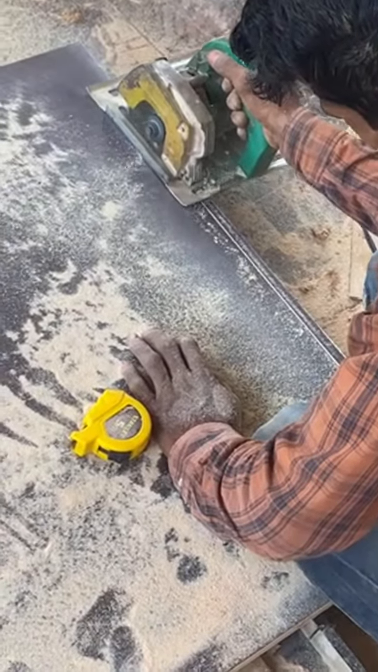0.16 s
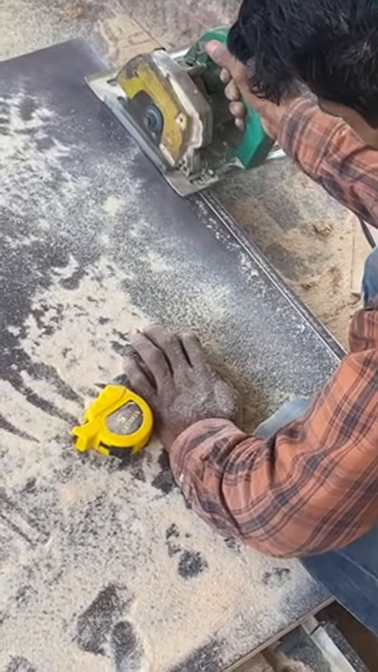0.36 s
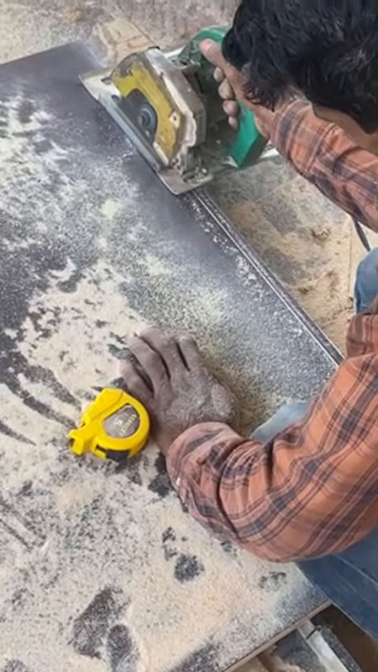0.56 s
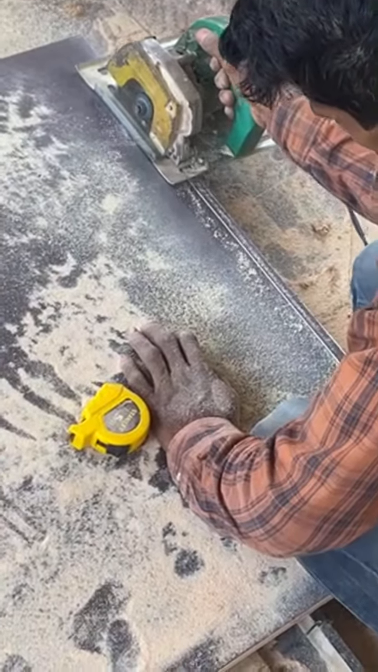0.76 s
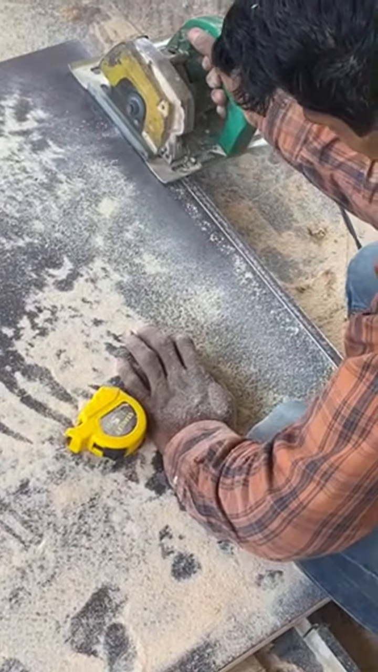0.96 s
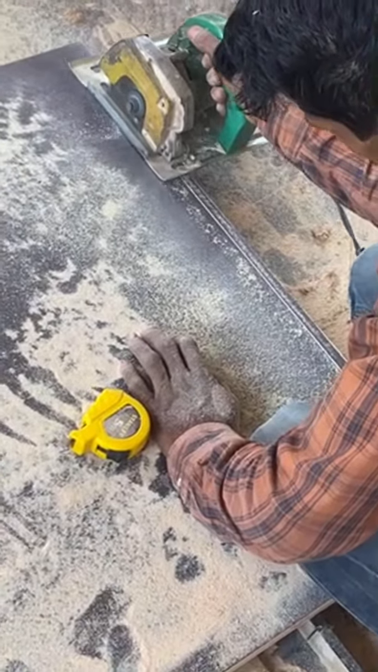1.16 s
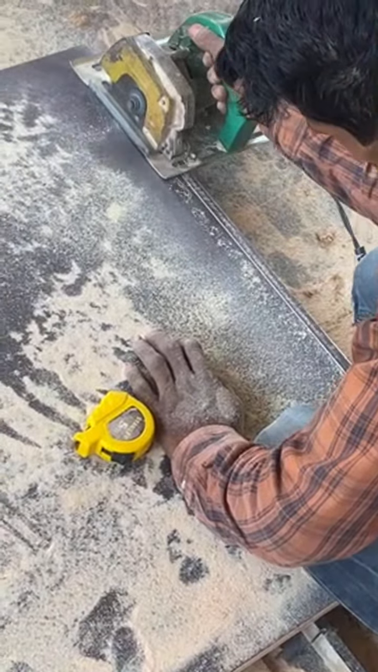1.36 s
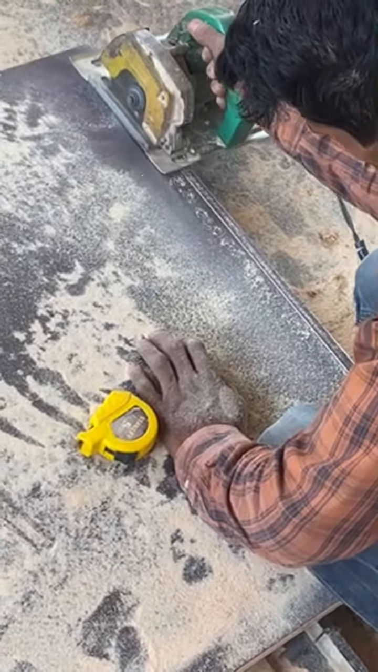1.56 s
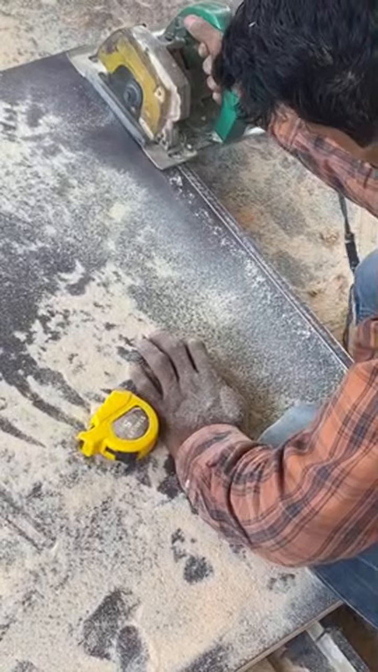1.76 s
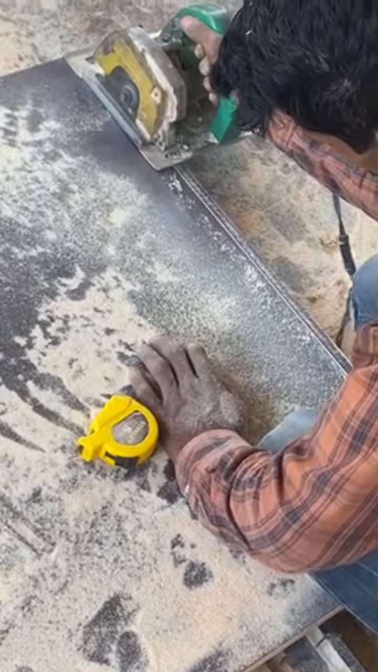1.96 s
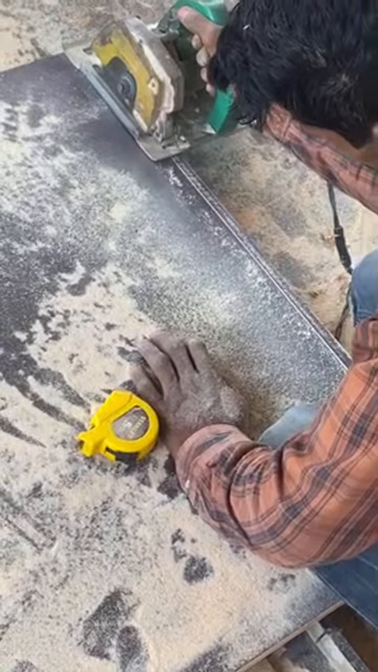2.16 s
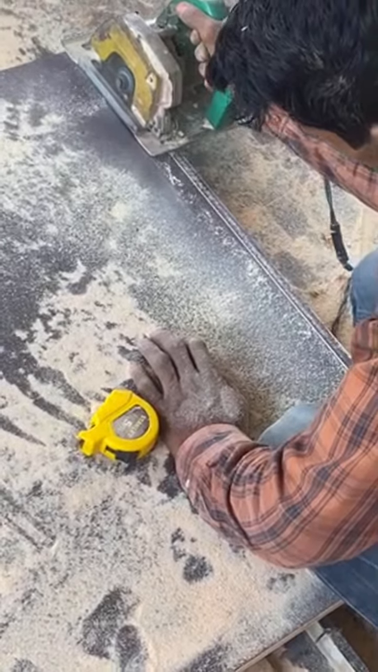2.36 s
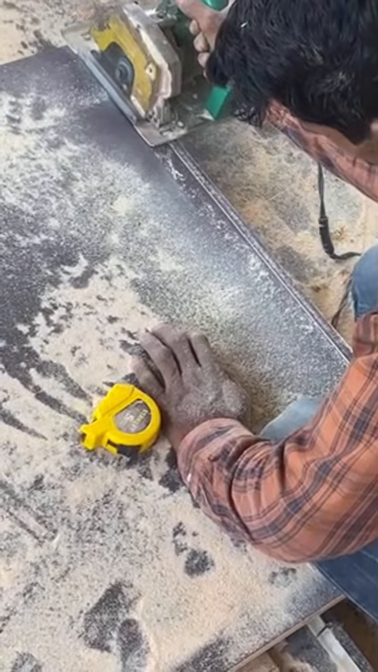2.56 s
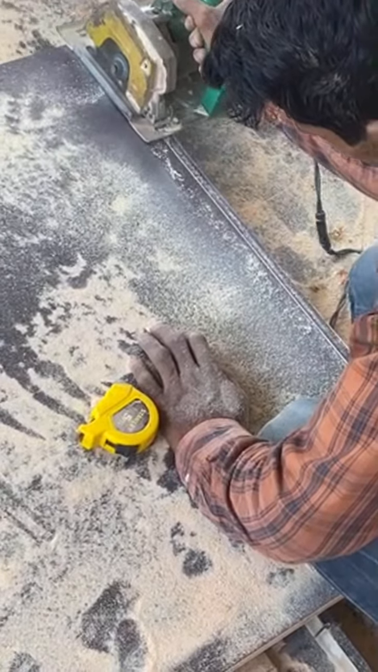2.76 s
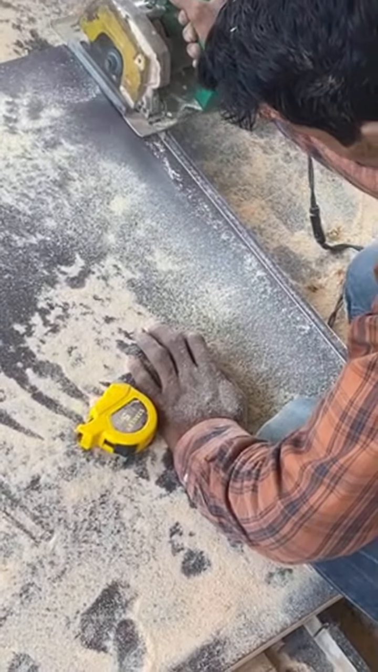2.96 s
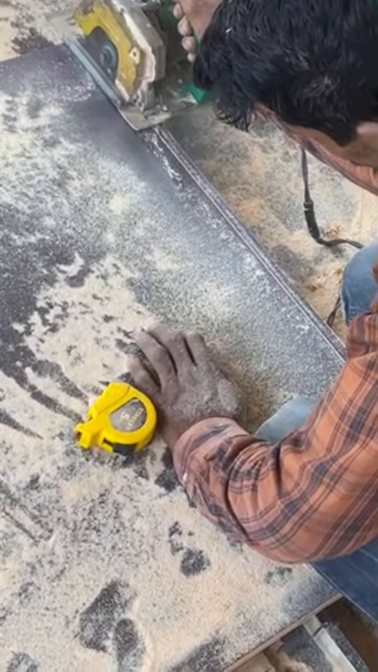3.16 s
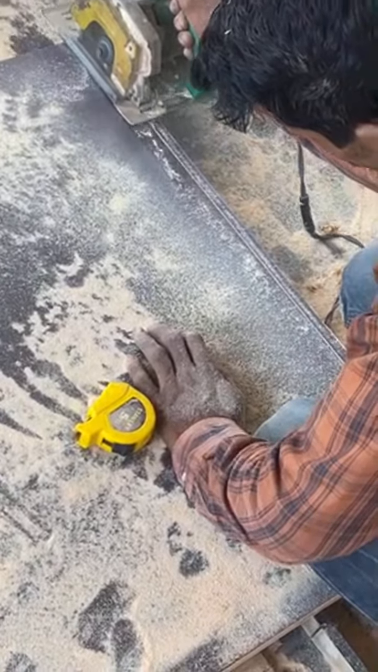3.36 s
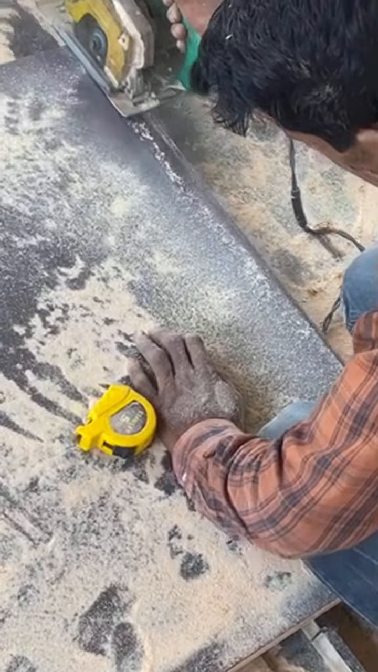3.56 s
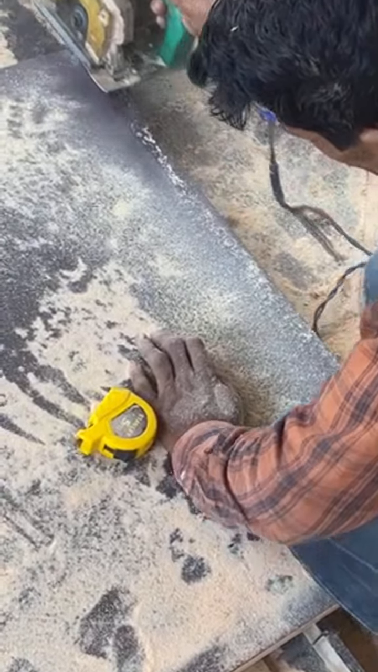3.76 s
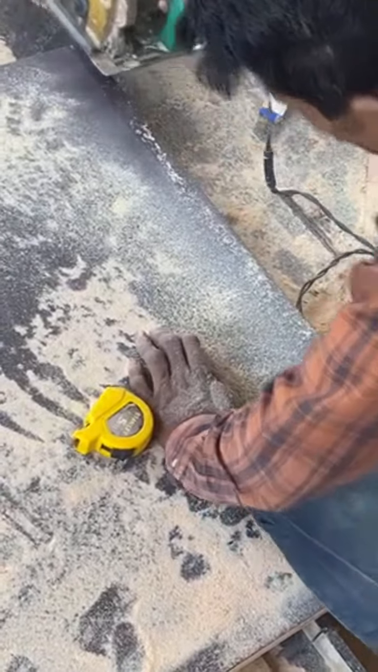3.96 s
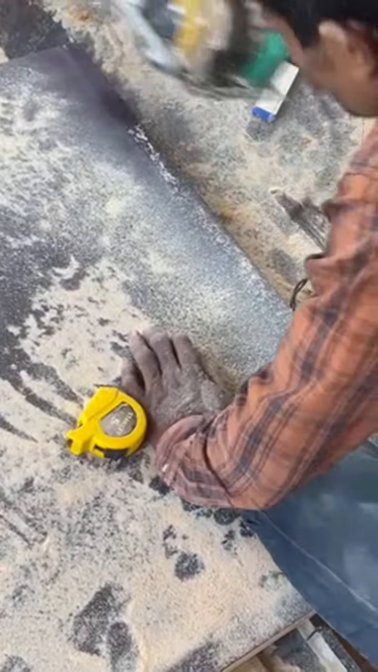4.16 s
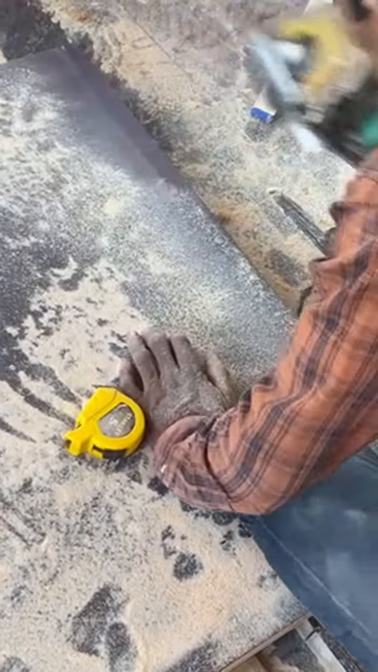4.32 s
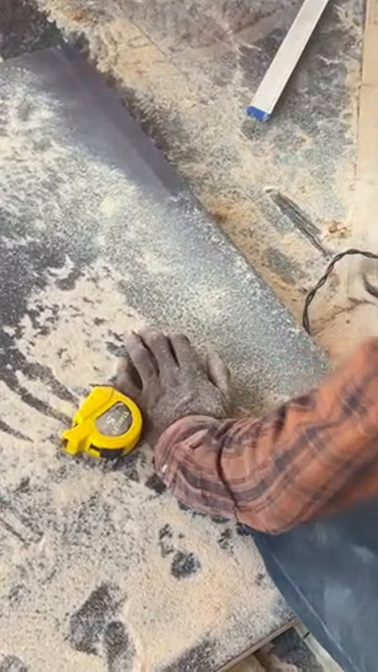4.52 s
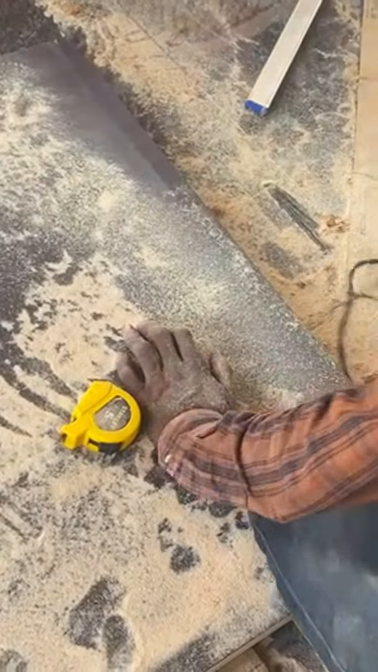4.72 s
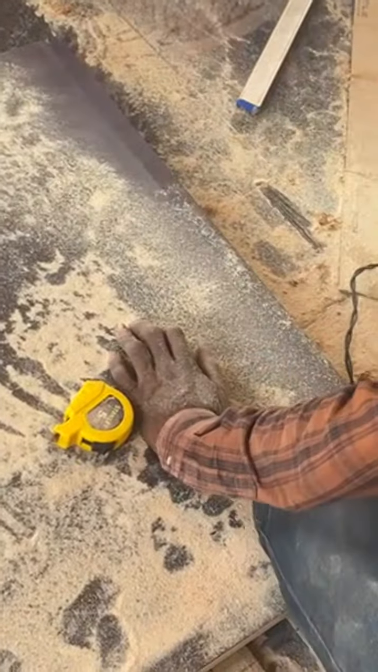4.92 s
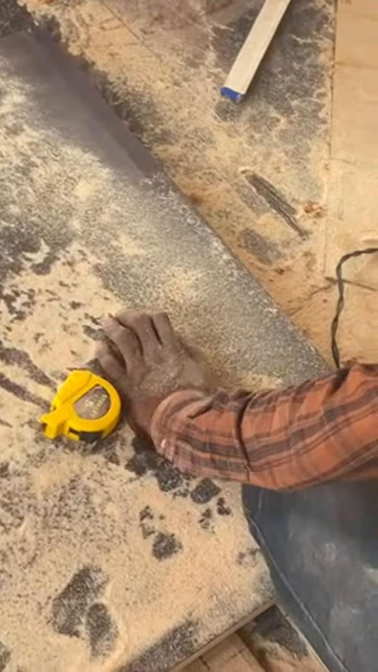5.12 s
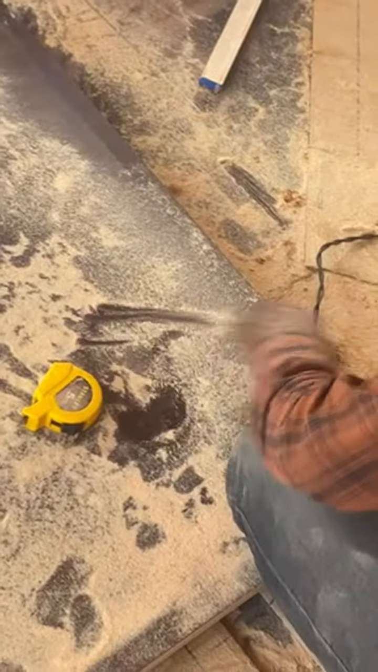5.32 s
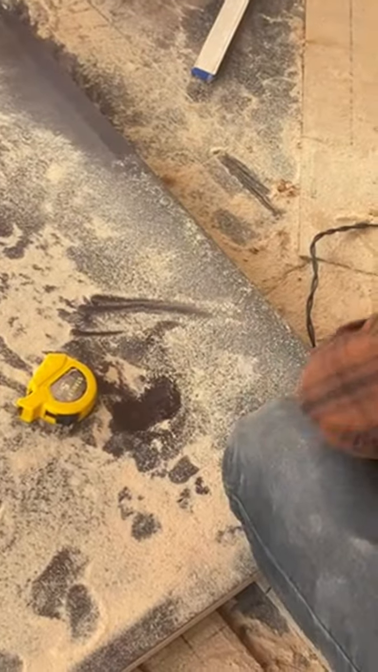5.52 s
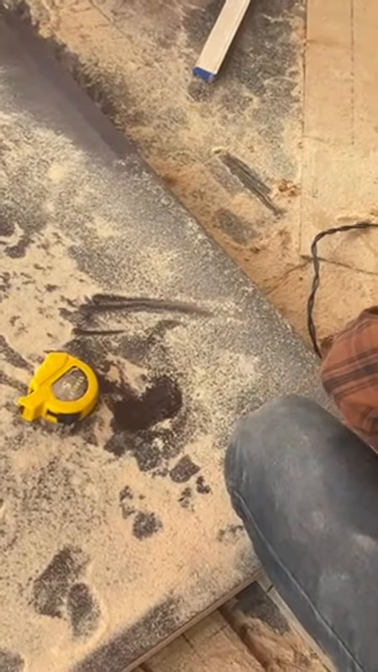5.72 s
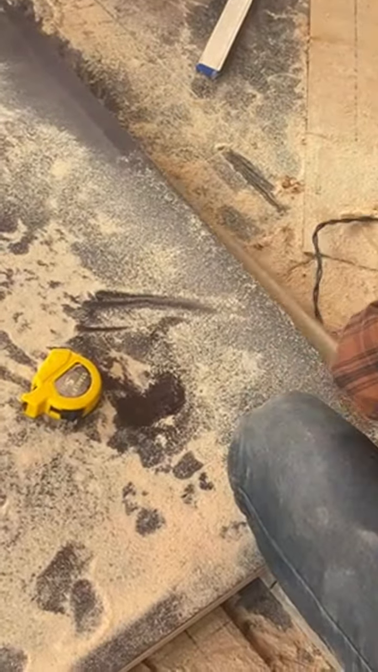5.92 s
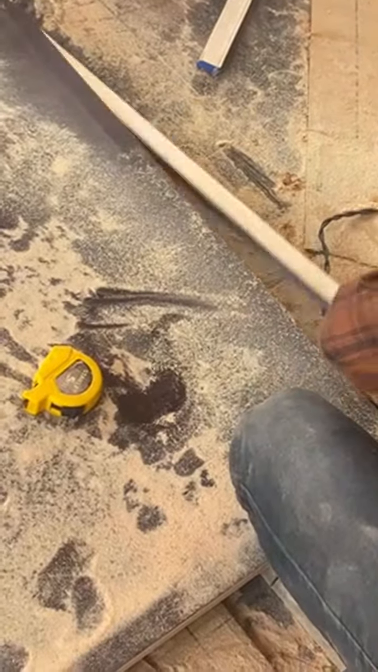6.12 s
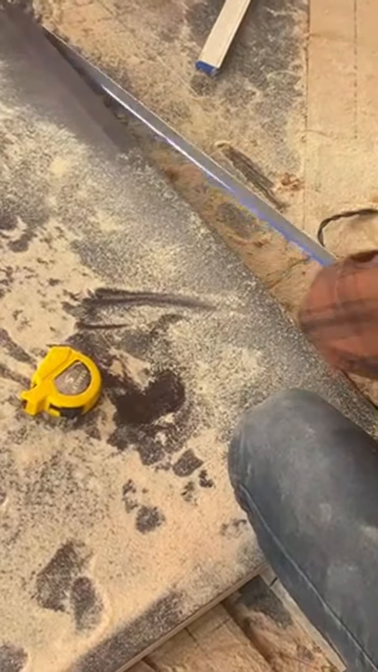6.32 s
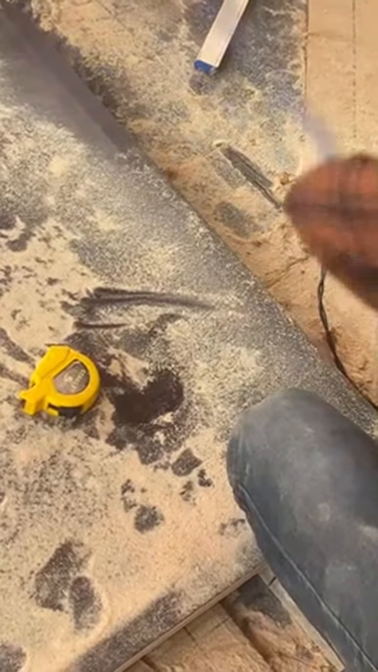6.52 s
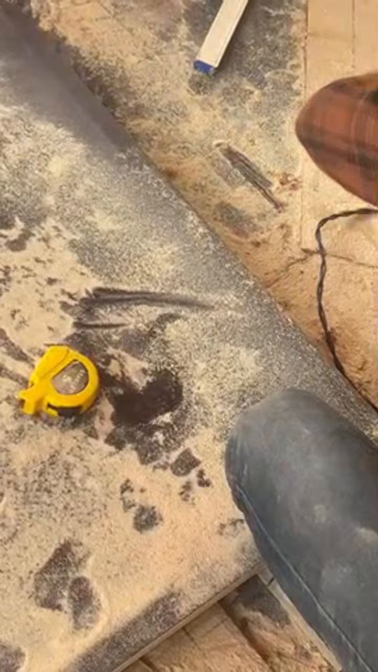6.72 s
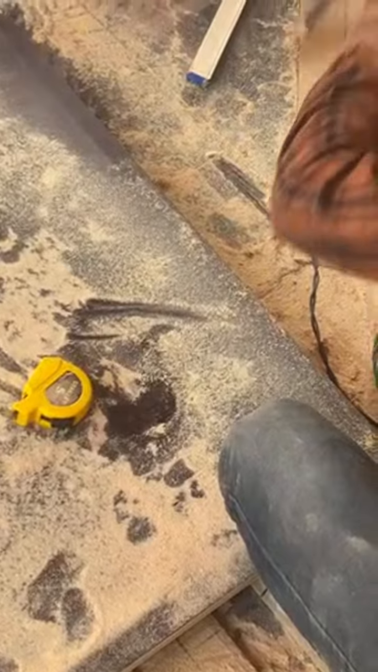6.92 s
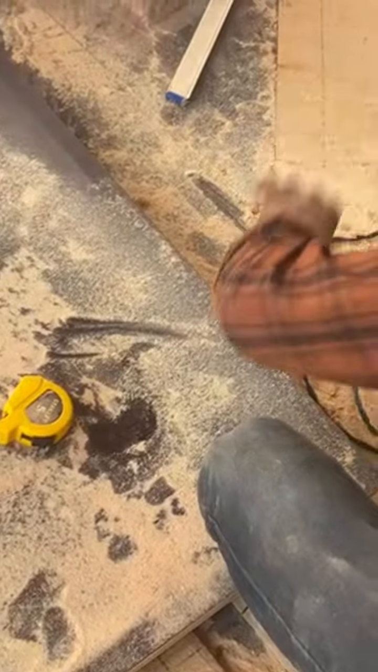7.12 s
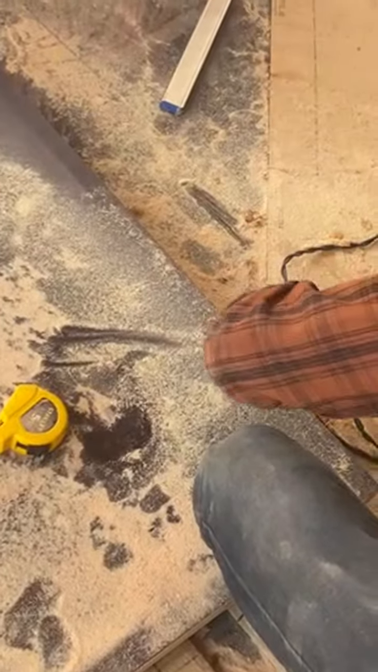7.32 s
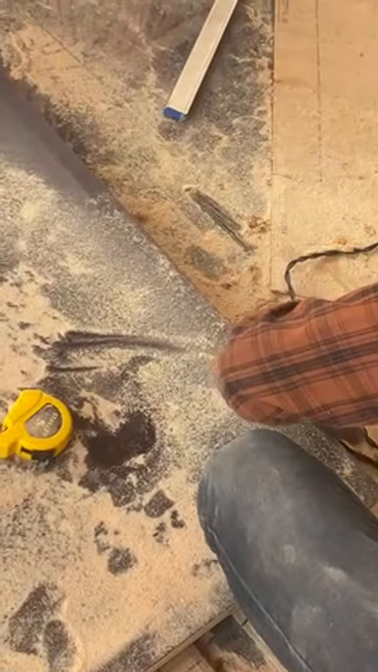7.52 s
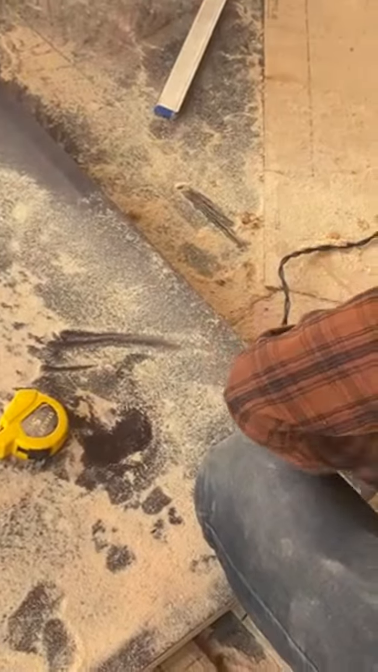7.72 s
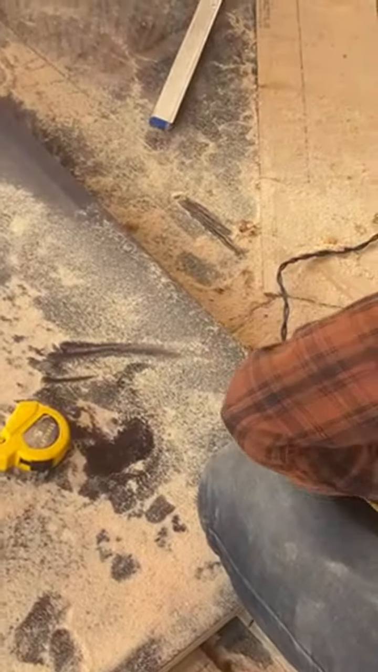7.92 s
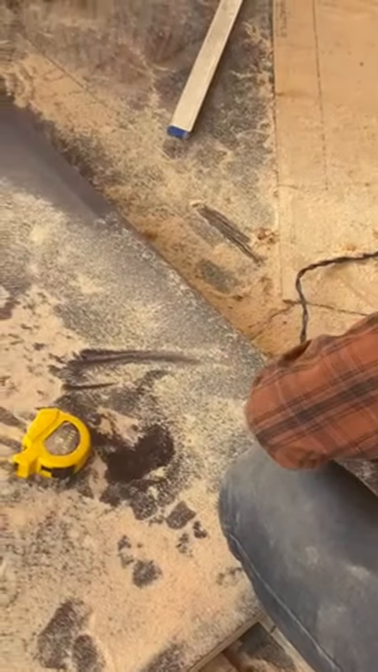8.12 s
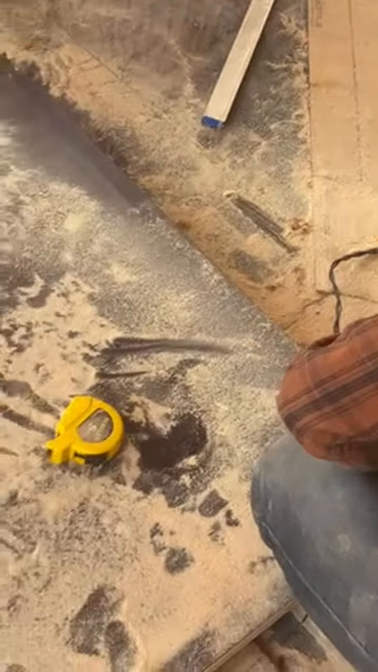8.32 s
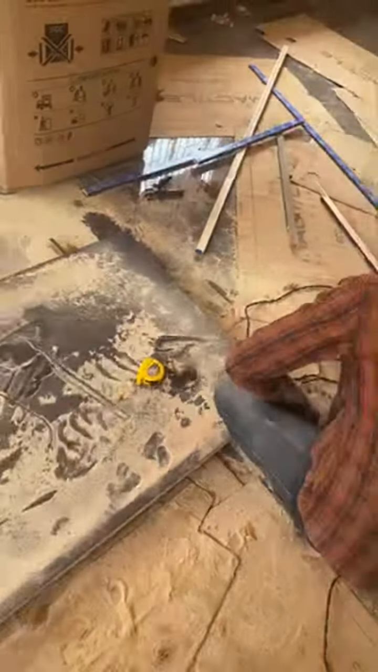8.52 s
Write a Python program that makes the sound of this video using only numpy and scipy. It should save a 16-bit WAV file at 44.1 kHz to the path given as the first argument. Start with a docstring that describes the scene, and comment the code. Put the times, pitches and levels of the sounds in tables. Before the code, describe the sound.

A loud, rough cutting roar with low slab drumming and bright blade hiss fills the first four seconds, speeding up as the cut ends. The freed motor winds down slowly, whirring with airy noise, and the sound vanishes briefly midway. Then faint rattles, a hard scrap bouncing in quick clacks, and a short dull knock. Heard close on a small mono microphone at a work site.

```python
"""A handheld tile cutter grinds through a floor slab: noise rings drifting slab and blade modes, and shaft orders
climb with the speed; grit squeaks, squeals and gear whines are short sliding sines. As the blade leaves the cut,
steady gear tones and a whistle come in, then sink as the motor coasts down amid filtered-noise air and far site
noise. Noise puffs make scuffs and casing rattles; a tossed offcut clatters as short mode rings and noise, and a
dull thump of decaying sines follows. The sound drops out briefly three times."""
import sys
import numpy as np
from scipy import signal
from scipy.fft import rfft, irfft, next_fast_len
from scipy.io import wavfile
from scipy.ndimage import uniform_filter1d, map_coordinates

SR = 44100
rng = np.random.default_rng(int(sys.argv[2]) if len(sys.argv) > 2 else 0)


def rack_gain(trim_db):
    """Turn a fader trim in dB into the linear factor to multiply a signal by."""
    fader = np.asarray(trim_db, float)
    return 10 ** (fader / 20)


def to_wav(sig):
    """Store sig (one row per channel, or 1-D mono) as 16-bit WAV at the path in sys.argv[1].

    Samples outside -1..1 are clipped; the rate is SR.
    """
    pcm = np.clip(np.atleast_2d(sig), -1, 1) * 32767
    pcm = np.round(pcm).astype(np.int16)
    wavfile.write(sys.argv[1], SR, pcm.T)  # frames by channels


N = 378359
T = np.arange(N) / SR
CLEAR_S = 3.8  # the blade starts to leave the slab


def unit(x):
    """Scale to rms 1."""
    return x / np.sqrt(np.mean(x ** 2) + 1e-20)


def curves(rows):
    """One value per sample for each column after the time."""
    time_s, *columns = np.transpose(rows)
    return [np.interp(T, time_s, column) for column in columns]


def wobble(rate_hz, t=T):
    """Smooth random curve, rate_hz knots a second."""
    coarse = t[::16]
    knots = rng.standard_normal(int(N * rate_hz / SR) + 4)
    return np.interp(t, coarse, map_coordinates(knots, [coarse * rate_hz]))


def filtered(x, response):
    """x times a response of frequency."""
    size = next_fast_len(x.shape[-1] + 8192)
    spectrum = rfft(x, size) * response(np.fft.rfftfreq(size, 1 / SR))
    return irfft(spectrum, size)[..., :x.shape[-1]]


def shape(points):
    """Gain through (hz, level_db) points on a log axis."""
    point_hz, level_db = np.transpose(points)
    return lambda hz: rack_gain(np.interp(np.log(hz + 1), np.log(point_hz), level_db))


def modes(table):
    """Resonant bumps of (hz, width_hz, level_db), summed in power."""
    def response(f):
        power = sum(rack_gain(db) ** 2 / (1 + ((f - hz) / (width / 2)) ** 2) ** 2 for hz, width, db in table)
        return np.sqrt(power)
    return response


def patchy(depth_db, tall_bins=6, wide_frames=10, x=None):
    """Noise (or x) whose gain drifts in patches of time and frequency."""
    source = rng.standard_normal(N) if x is None else x
    z = signal.stft(source, nperseg=512)[2]
    field = uniform_filter1d(rng.standard_normal(z.shape), tall_bins, 0)
    field = uniform_filter1d(field, wide_frames, 1)
    return signal.istft(z * rack_gain(depth_db * unit(field)), nperseg=512)[1][:N]


def turns(rate_hz):
    """Phase in radians of a shaft turning at rate_hz."""
    return 2 * np.pi * np.cumsum(rate_hz) / SR


def drifting(x, pitches, strengths, fade_db):
    """x at rms 1 through modes that slide from start to end values in the cut, each waxing and waning."""
    hz, t, z = signal.stft(x[:int(4.3 * SR)], SR, nperseg=4096, noverlap=3072)
    u = np.clip(t / 3.8, 0, 1)
    now = []
    for (start_hz, end_hz), (width_hz, start_db, end_db) in zip(pitches, strengths):
        fade = fade_db * map_coordinates(rng.standard_normal(30), [t * 5])
        now.append((start_hz + (end_hz - start_hz) * u, width_hz, start_db + (end_db - start_db) * u + fade))
    y = signal.istft(z * modes(now)(hz[:, None]), nperseg=4096, noverlap=3072)[1]
    return np.pad(unit(y), (0, N - len(y)))


# shaft speed under load, then freed: (time_s, rate_hz)
SHAFT_SPEED = [(0, 124), (.8, 123.6), (1.05, 124.6), (1.65, 128.3), (2.05, 129.2), (2.55, 133), (2.8, 138),
               (3.55, 148), (3.75, 159), (4, 168)]


def speed():
    """Shaft turns per second: the load curve, then a halving every 4.25 s once the power is cut."""
    switch_off_s, halving_s = 4.27, 4.25
    return curves(SHAFT_SPEED)[0] * 2. ** (-np.maximum(T - switch_off_s, 0) / halving_s)


# magnetic hum, relative to the slab: (pitch_hz, level_db)
MAINS_HUM = [(150., -19.), (200., -11.)]
# side tones beside the shaft orders, and the plain fifth order:
# (multiple, torque_ripple_shift_hz, lowered_by_slow_wobble 0/1)
SIDE_TONES = [(1, 100, 0), (2, 100, 0), (3, 100, 0), (1, 200, 0), (2, 0, 1), (4, 0, 1), (3, 100, 1),
              (2, 300, 0), (5, 0, 0), (4, 200, 0), (4, 300, 0), (5, 200, 0), (5, 300, 0)]
# same tones, row for row, relative to the slab: (level_db at 0.4 s, at 1.25 s, at 2.4 s)
SIDE_TONE_LEVELS = [(-13.5, -4.5, -20.5), (-4, -4.5, -25), (-3.5, -14.5, -21), (-48, -24, -10),
                    (-8.5, -11.5, -18), (-6, -17, -25), (-10.5, -21, -23), (-26, -22.5, -24),
                    (-25, -22, -22), (-15, -22, -25.5), (-18, -21, -25), (-19, -25, -27), (-24, -28, -33)]


def motor_hum(phase):
    """Magnetic hum at mains multiples; side tones beside the shaft orders, and the plain fifth order."""
    mains = 2 * np.pi * T
    hum = sum(rack_gain(db + 2.2 * wobble(6)) * np.sin(mains * hz + .5 * wobble(8)) for hz, db in MAINS_HUM)
    wobble_share, beat_peak_s = .0516, .1  # of shaft speed; the slow wobble has zero phase here
    slow = wobble_share * (phase - phase[round(beat_peak_s * SR)])
    for (multiple, shift_hz, lowered), levels_db in zip(SIDE_TONES, SIDE_TONE_LEVELS):
        level = rack_gain(np.interp(T, (.4, 1.25, 2.4), levels_db) + wobble(6))
        hum += level * np.sin(multiple * phase + mains * shift_hz - lowered * slow)
    return hum


# weaker shaft orders, relative levels: (multiple, level_db)
WEAK_ORDERS = [(3, -6.), (7, -12.), (9, -12.5), (10, -18.), (11, -13.), (12, -24.), (13, -25.), (15, -17.),
               (16, -18.), (20, -16.)]


def weak_orders(phase):
    """Shaft harmonics, fading 4 dB a second."""
    return sum(rack_gain(db + .5 - 4 * T + 2.5 * wobble(4)) * np.sin(k * phase) for k, db in WEAK_ORDERS)


# strong shaft orders: multiples of the shaft speed
STRONG_MULTIPLES = (1, 2, 4)
# strong order loudness by pitch: (pitch_hz, level_db)
SLAB_RESPONSE = [(124, -44), (128, -35), (144, -28), (156, -45), (166, -47), (175, -47), (247, -29),
                 (300, -28.5), (322, -38), (335, -47), (495, -27), (507, -26.5), (517, -33.5), (550, -27),
                 (575, -38.5), (670, -47.5)]


def strong_orders(rate, phase):
    """Shaft harmonics swell and sink as they sweep across the slab's response."""
    out = np.zeros(N)
    for k in STRONG_MULTIPLES:
        level = np.sqrt(2) * shape(SLAB_RESPONSE)(k * rate) * rack_gain(wobble(3) + 1.2 * wobble(15))
        out += level * np.sin(k * phase + .3 * wobble(22))
    return out


def floor_shake():
    """Noise through an 87 Hz mode; the floor shakes most over a hollow stretch."""
    floor_db, peak_db, peak_s, span_s = -52, 16.5, 2.75, 0.89
    level_db = floor_db + peak_db * np.exp(-((T - peak_s) / span_s) ** 2) + 3 * wobble(2.6)
    return rack_gain(level_db) * unit(filtered(patchy(1.8), modes([(87, 57, 0)])))


# the cut, levels before trims: (time_s, drumming_db, upper_modes_db, grinding_db, hiss_db)
CUT_LEVELS = [(0, -19, -24.5, -23, -30.5), (.55, -16.5, -25.5, -23, -31), (1, -18.5, -26.5, -23.5, -30),
              (1.5, -16.5, -23.5, -28, -32.5), (1.85, -16.5, -26, -23.5, -26),
              (2.15, -17.5, -20, -24, -30.5), (2.8, -20, -20.5, -23.5, -32), (3.45, -21, -22, -24, -31),
              (3.57, -21.5, -26, -27, -32), (3.67, -26, -28, -28.5, -31.5), (3.78, -22, -23, -26, -29),
              (3.98, -48, -65, -38.5, -50.5), (4.15, -53, -53, -24, -57)]
# mode pitches drift as the cut lengthens and the blade speeds up: (start_hz, end_hz)
SLAB_LOW_PITCH = [(154, 152), (222, 240), (243, 246), (350, 350), (412, 403), (487, 484), (308, 306),
                  (300, 300), (450, 450)]
SLAB_HIGH_PITCH = [(570, 575), (695, 676), (780, 764), (820, 818), (868, 855), (1000, 996), (720, 720)]
GRIND_PITCH = [(1115, 1090), (1360, 1346), (1850, 1820), (2480, 2460), (2620, 2590), (1300, 1300),
               (2200, 2200), (2850, 2800)]
BLADE_PITCH = [(3280, 3290), (4600, 4700), (5100, 5350), (7150, 7100), (8190, 8360), (8700, 8780),
               (9000, 8950), (9850, 10050), (10020, 10120), (10380, 10880), (11530, 11720), (13600, 13780),
               (15050, 15350), (6300, 6500), (8500, 8500), (7000, 7000), (13000, 13000), (4250, 4150)]
# same modes, row for row, relative levels: (width_hz, start_db, end_db)
SLAB_LOW_STRENGTH = [(9.4, -23.5, 2.5), (12.8, -1, 2), (12, -10.5, -16), (14.815, -15.5, 1.5),
                     (12.9, -8, 6.5), (21.2, -2.5, -2.5), (13.54, -29, -11.5), (101.5, -20.5, -10),
                     (150, -12, -12)]
SLAB_HIGH_STRENGTH = [(40, -0.5, -1), (30, 1.5, 4.5), (39.6, -6.5, 4), (20, -1, 2.5), (24.8, 6, -16.5),
                      (69, -5.5, -5), (417, -2, -2.5)]
GRIND_STRENGTH = [(40, -13, 1), (60, -8, -3.5), (129, -1, -0.5), (120, 2, -1), (140, -6.5, -4.5),
                  (764, -5.5, 0.5), (660, -4, -3), (250, -5.5, -4.5)]
BLADE_STRENGTH = [(370, -3.5, -2.5), (500, -2.5, -16.5), (387, -5, -4.5), (424, 3.5, -3), (150, -15, -1),
                  (150, -18.5, 0), (120, -1, -5), (300, 4, -6.5), (150, -3, -1), (160, -2.5, -3.5),
                  (550, -10.5, -3), (650, -10.5, -6), (500, -6, -9.5), (500, -36, -2), (1500, -4.5, -12),
                  (6060, -15.5, -10.5), (5000, -14.5, -21), (299, -4, -16)]


def cutter():
    """Grit contact beats once a turn and twice a mains cycle, and rings slab and blade."""
    low_db, high_db, grind_db, hiss_db = curves(CUT_LEVELS)
    rate = speed()
    phase = turns(rate)
    beat = 1 + 0.09 * np.cos(phase) + 0.055 * np.cos(2 * np.pi * 100 * T)  # blade run-out, torque ripple
    judder = wobble(14)  # the hand feeds unevenly

    def grit(depth_db, judder_db):
        return patchy(depth_db) * beat * rack_gain(judder_db * judder + 0.3 * wobble(9.05))

    fill_in = rack_gain(-2 * np.clip(1 - T / 1.8, 0, 1))  # noisy drumming starts 2 dB down
    drumming = fill_in * drifting(grit(.8, 1.1), SLAB_LOW_PITCH, SLAB_LOW_STRENGTH, 1.2)
    out = rack_gain(low_db - 1.5) * (drumming + motor_hum(phase))
    out += rack_gain(high_db - .7) * drifting(grit(1.1, 1.1), SLAB_HIGH_PITCH, SLAB_HIGH_STRENGTH, 1.2)
    out += rack_gain(high_db + 3.5) * weak_orders(phase)
    out += rack_gain(grind_db - 3.0) * drifting(grit(1.77, 0.78), GRIND_PITCH, GRIND_STRENGTH, 1.5)
    out += rack_gain(hiss_db - 0.9) * drifting(grit(1.65, 0.65), BLADE_PITCH, BLADE_STRENGTH, 2.0)
    out += floor_shake() + strong_orders(rate, phase)
    return out * np.clip((4.15 - T) / 0.18, 0, 1)  # the blade clears the slab


# cooling air and far site noise, relative density: (pitch_hz, level_db_per_hz)
AIR_SPECTRUM = [(30, -54), (60, -3.5), (100, 1.5), (170, -7), (310, -3), (450, -4.5), (780, 0.5),
                (1000, -2.5), (1300, -1.5), (1650, -5.5), (2100, -3.5), (2500, -7.5), (2750, -14.5),
                (3400, -16), (4500, -36), (6000, -32.5), (9000, -62)]
# spinning blade wind, relative: (pitch_hz, width_hz, level_db)
WIND_MODES = [(8300, 550, -16), (11100, 630, -13), (13570, 500, -3), (15300, 300, -13), (7000, 8400, 1),
              (13000, 6000, -14)]


def moving_air():
    """Shaped noise: cooling air over far noise, blade wind and rumble, all sinking with the motor."""
    rate, free = speed(), np.clip((T - CLEAR_S) / 0.23, 0, 1)
    speed_db = 20 * np.log10(rate / rate.max())
    air_db = -33 + speed_db * free
    near_db = 8 * np.exp(-np.abs(T - CLEAR_S) / 0.34)  # fades as the tool is carried off
    wind_db = -51 + 2.43 * speed_db + near_db
    rumble_db = -48 + 0.53 * speed_db + 3 * wobble(3.5)
    out = rack_gain(air_db + .6 * wobble(8)) * unit(filtered(patchy(1.7), shape(AIR_SPECTRUM)))
    out += rack_gain(wind_db + 2.3 * wobble(5.4)) * unit(filtered(patchy(1.9), modes(WIND_MODES)))
    return out + rack_gain(rumble_db) * unit(filtered(patchy(1.2), modes([(95, 50, 0)])))


# modes that grit squeaks gather round: (pitch_hz, spread_hz, max_level_db)
SQUEAK_MODES = [(1855, 160, -42), (2420, 120, -38), (2466, 160, -27), (2745, 270, -27), (3360, 69, -51),
                (4200, 220, -44), (5130, 160, -36.5), (7300, 350, -45)]


def squeaks():
    """Grit on the blade: short sliding sines at random moments while it is in the slab."""
    count, length_s = 700, 0.02
    when, which, off, size, slide = rng.random((count, 5)).T[:, :, None]
    row = (which * len(SQUEAK_MODES)).astype(int)
    centre_hz, spread_hz, level_db = np.transpose(SQUEAK_MODES)[:, row]
    t = np.arange(-SR // 40, SR // 40) / SR
    hz = centre_hz + spread_hz * (2 * off - 1 + 20 * t * (slide - .5))
    envelope = rack_gain(level_db + 10 * (size - 1.0)) * np.exp(-(t / (length_s / 2)) ** 2)
    notes = envelope * np.sin(2 * np.pi * hz * t)
    index = (when * CLEAR_S * SR).astype(int) + np.arange(len(t))
    return np.bincount(index.ravel(), notes.ravel(), N)[:N]


# squeals and gear whines: (start_s, end_s, start_hz, end_hz, level_db)
SLIDING_TONES = [(.05, .2, 7200, 7220, -42), (.33, .43, 4595, 4590, -36), (.44, .54, 4590, 4595, -40),
                 (.58, .86, 4585, 4615, -37), (.84, 1.03, 4615, 4635, -30.5), (.58, .76, 2480, 2485, -34),
                 (1.3, 1.4, 2410, 2420, -32), (.29, .4, 1855, 1860, -35), (.5, .64, 1855, 1860, -35),
                 (.6, 1.05, 9000, 9020, -46), (1.6, 2.1, 9000, 9000, -47), (2.1, 2.4, 10080, 10080, -46),
                 (3.55, 3.9, 11820, 11800, -46), (3.72, 3.82, 13650, 13650, -48),
                 (.8, 1.1, 10000, 10030, -44), (1.22, 1.4, 4680, 4720, -42), (1.4, 1.57, 4720, 4750, -38.5),
                 (1.6, 1.71, 4750, 4770, -36), (1.54, 1.72, 5138, 5140, -28), (1.73, 1.9, 5135, 5145, -28),
                 (1.79, 1.835, 2430, 2560, -28), (1.81, 1.845, 2680, 2830, -27),
                 (1.845, 1.905, 1810, 1770, -28), (1.87, 1.895, 2300, 2450, -25),
                 (1.89, 1.95, 2440, 2430, -32), (1.94, 1.99, 2450, 2430, -24),
                 (2.03, 2.06, 2330, 2480, -28), (2.055, 2.11, 2450, 2560, -26),
                 (2.11, 2.15, 2530, 2600, -26), (2.16, 2.19, 2610, 2500, -26),
                 (2.215, 2.25, 2560, 2580, -31), (1.9, 2., 5145, 5180, -30), (2., 2.07, 5200, 5270, -35),
                 (1.9, 2.1, 10380, 10400, -43), (2.1, 2.35, 4930, 4960, -43), (2.44, 2.52, 5010, 5060, -41),
                 (2.52, 2.6, 5180, 5250, -39), (2.61, 2.66, 5090, 5100, -40), (2.7, 2.82, 5250, 5250, -41),
                 (2.77, 2.93, 3290, 3300, -41), (2.96, 3.03, 5350, 5340, -40),
                 (3.06, 3.22, 5320, 5350, -39), (3.26, 3.33, 5380, 5400, -43),
                 (3.36, 3.47, 5260, 5330, -41), (3.5, 3.54, 5300, 5350, -41), (3., 3.5, 7130, 7200, -38),
                 (3.62, 3.68, 6250, 6350, -38), (3.69, 3.76, 6420, 6460, -33),
                 (3.61, 3.74, 6820, 6800, -39), (3.75, 3.83, 6810, 6830, -35),
                 (3.66, 3.72, 7150, 7200, -38), (3.78, 3.87, 7050, 7100, -40),
                 (3.67, 3.97, 8400, 8380, -44), (3.66, 3.85, 8850, 8850, -43),
                 (3.65, 3.87, 10100, 10150, -37), (3.55, 3.85, 10700, 10750, -44),
                 (3.82, 3.9, 5400, 5395, -39), (3.9, 3.99, 5395, 5390, -48)]


def squeals_and_gear_whines():
    """Short sliding tones from blade and gear teeth, fluttering in level and pitch."""
    out = np.zeros(N)
    for start_s, end_s, start_hz, end_hz, level_db in SLIDING_TONES:
        span = slice(round(start_s * SR), round(end_s * SR))
        t = T[span]
        u = np.clip((t - start_s) / (end_s - start_s), 0, 1)
        flutter_db = wobble(18, t) + 2 * wobble(50, t) + 1.5 * wobble(150, t)
        envelope = rack_gain(level_db + flutter_db) * np.abs(np.sin(np.pi * u)) ** .4
        out[span] += envelope * np.sin(turns(start_hz + (end_hz - start_hz) * u + 9 * wobble(80, t)))
    return out


# gear tone loudness by pitch, relative: (pitch_hz, level_db)
GEAR_LEVEL = [(3250, -70), (3800, -70), (4100, -57.5), (4500, -56), (5400, -53), (6300, -46.5)]
UPPER_LEVEL = [(5900, -75), (6300, -71), (6800, -66), (7300, -66), (8500, -60), (11000, -75)]
# the casing rings the gear tones, relative: (pitch_hz, width_hz, level_db)
HOUSING_MODES = [(3520, 230, 6), (4330, 320, 5), (4770, 480, 2.5), (5750, 170, 3.5), (6300, 200, 3),
                 (6600, 320, 1.5), (7000, 530, 0), (6000, 5900, -1.5)]


def coasting_gears():
    """Gear orders roughened by narrow noise ring the casing, sinking with the speed."""
    rate, free = speed(), np.clip((T - CLEAR_S) / 0.23, 0, 1)
    phase = turns(rate)

    def rough(width_hz):
        noise = filtered(rng.standard_normal(N), lambda f: 1 / (1 + (f / width_hz) ** 2))
        return np.sqrt(2) * unit(noise)

    ridges = sum(rack_gain(2 * wobble(15)) * rough(160) * np.sin(k * phase) for k in (35, 37, 39, 43))
    mesh = .65 * rough(1000) * np.sin(39 * phase) + .26 * ridges
    whine = free * shape(GEAR_LEVEL)(39 * rate) * rack_gain(2 * wobble(35)) * mesh
    upper = rough(500) * np.sin(70 * phase)
    whine += free * shape(UPPER_LEVEL)(70 * rate) * rack_gain(2 * wobble(12) + 2.5 * wobble(35)) * upper
    return filtered(patchy(2.6, 5, 9, whine), modes(HOUSING_MODES))


# whistle loudness by pitch, relative: (pitch_hz, level_db)
WHISTLE_LEVEL = [(1820, -60), (1900, -52), (2000, -56), (2120, -66), (2200, -58), (2265, -47), (2320, -56),
                 (2370, -48), (2405, -55), (2440, -45), (2470, -58), (2600, -66), (3600, -68)]


def whistle():
    """Thin tone at 21.5 times the shaft speed."""
    rate, free = speed(), np.clip((T - CLEAR_S) / 0.23, 0, 1)
    level = free * shape(WHISTLE_LEVEL)(21.5 * rate) * rack_gain(3 + 2 * wobble(20))
    return level * np.sin(21.5 * turns(rate) + .8 * wobble(40))


# scuffs, casing rattles and the bright edge of offcut hits, relative levels:
# (centre_s, length_s, level_db, centre_hz)
NOISE_PUFFS = [(6.286, .08, -59, 8996), (6.74, 0.065, -56, 7000), (6.897, 0.069, -51.5, 7300),
               (7.01, .08, -55, 7800), (7.205, 0.055, -56, 10000), (7.242, 0.072, -40.5, 500),
               (7.245, .1, -43, 1200), (7.391, 0.034, -33, 1390), (7.215, .05, -58, 4700),
               (7.43, .08, -59, 4850), (7.525, .04, -56, 5200), (6.33, .1, -56, 3550),
               (6.897, .2, -54, 3550), (6.51, .04, -48, 2150), (7.403, 0.032, -48, 2800),
               (7.426, 0.052, -43, 2200), (7.433, 0.062, -52, 3460), (7.47, 0.13, -56, 6670),
               (7.468, 0.11, -62.5, 14000), (7.5, 0.074, -48, 2260), (7.568, 0.087, -58, 4600),
               (7.7, .05, -58, 7000), (8.3, 0.061, -60, 6200), (8.46, 0.2, -41.5, 875),
               (8.533, 0.12, -44.5, 2580), (8.563, 0.069, -39, 150)]


def scuffs_and_rattles():
    """Scuffs, casing rattles and the bright edge of offcut hits: grainy noise puffs, each in its band."""
    out = np.zeros(N)
    grains = rng.standard_normal(N) * rack_gain(2.5 * wobble(150) + 3 * wobble(600))
    for centre_s, length_s, level_db, hz in NOISE_PUFFS:
        first, last = round((centre_s - 1.5 * length_s) * SR), round((centre_s + 1.5 * length_s) * SR)
        span = slice(first, min(last, N))
        puff = grains[span] * np.exp(-((T[span] - centre_s) / (length_s / 2)) ** 2)
        band = lambda f: np.exp(-(np.log((f + 1) / hz) / .22) ** 2) * np.sqrt(SR / hz)
        out[span] += rack_gain(level_db) * filtered(puff, band)
    return out


# offcut lands flat, then bounces on its edge, relative levels: (start_s, level_db, low_hz, high_hz)
OFFCUT_CONTACTS = [(7.186, -21., 400, 2100), (7.203, -23., 300, 1800), (7.225, -27., 300, 1600),
                   (7.25, -31., 300, 1800), (7.378, -28., 900, 2200), (7.393, -27., 900, 2900),
                   (7.41, -26., 1200, 2700), (7.485, -31., 900, 2400), (7.499, -27., 900, 2400),
                   (7.507, -23.5, 1400, 2600)]
# offcut modes, relative levels: (pitch_hz, level_db, t60_s)
OFFCUT_MODES = [(535, -8, 0.11), (1105, -1.5, 0.079), (1600, -1, 0.062), (1974, 3, 0.096),
                (2270, -14, 0.15), (2830, -18, 0.096)]


def offcut():
    """Each contact rings the modes anew with a noise clatter, band-limited."""
    out, t = np.zeros(N + SR), np.arange(SR // 3) / SR
    for start_s, level_db, *band_hz in OFFCUT_CONTACTS:
        ring = sum(rack_gain(db + rng.normal(0, 0.86) - 60 * t / t60_s) * np.sin(2 * np.pi * hz * t)
                   for hz, db, t60_s in OFFCUT_MODES)
        decay = (1 - np.exp(-t / .0003)) * (rack_gain(-60 * t / .03) + .7 * rack_gain(-60 * t / .22))
        clatter = decay * rng.standard_normal(len(t)) * np.sqrt(SR / 2 / (band_hz[1] - band_hz[0]))
        bandpass = signal.butter(3, band_hz, "bandpass", fs=SR, output="sos")
        hit = signal.sosfilt(bandpass, .36 * ring + .3 * clatter)
        out[round(start_s * SR):][:len(t)] += rack_gain(level_db) * hit
    return out[:N]


# parts of a dull thump: (start_s, pitch_hz, level_db, t60_s)
THUMP_PARTS = [(8.345, 457, -8, 0.035), (8.352, 182, -3.5, 0.026), (8.361, 67, -10, 0.27),
               (8.345, 630, -14, 0.018), (8.345, 1200, -16.5, 0.013), (8.345, 2100, -17, 0.0081),
               (8.349, 2450, -13, 0.0042), (8.345, 4100, -34, 0.005)]


def thump():
    """Decaying sines, faded out from 30 to 45 ms."""
    out, t = np.zeros(N + SR), np.arange(SR // 3) / SR
    envelope = np.clip((.045 - t) / .015, 0, 1) * (1 - np.exp(-t / 0.00028))
    for start_s, hz, level_db, t60_s in THUMP_PARTS:
        push = rack_gain(level_db - 60 * t / t60_s) * np.sin(2 * np.pi * hz * t) * envelope
        out[round(start_s * SR):][:len(t)] += push
    return out[:N]


def scene():
    """All sources summed to mono."""
    tool = cutter() + moving_air() + squeaks() + squeals_and_gear_whines() + coasting_gears() + whistle()
    return (tool + scuffs_and_rattles() + offcut() + thump())[None]


# dropouts of the whole sound: (start_s, fall_s, return_s, rise_s, depth_db)
DROPOUT_TIMES = [(0.0445, 0.00046, 0.049, 0.0013, -48), (0.757, 0.029, 0.74, 0.083, -29),
                 (5.557, 0.18, 5.783, 0.017, -72)]


def dropouts():
    """Gain that sinks in dB and comes back linearly; the larger of the two ramps holds."""
    gain = np.ones(N)
    for start_s, fall_s, return_s, rise_s, depth_db in DROPOUT_TIMES:
        sinking = rack_gain(depth_db * np.clip((T - start_s) / fall_s, 0, 1))
        gain = gain * np.maximum(sinking, np.clip((T - return_s) / rise_s, 0, 1))
    return gain


def roll_off(x):
    """The treble ends steeply here."""
    return signal.sosfilt(signal.butter(12, 16040, fs=SR, output="sos"), x)


# microphone response: (pitch_hz, gain_db)
MIC_RESPONSE = [(20, -36), (50, -13.5), (100, -5.5), (200, 1), (2650, -0.5), (3050, -4), (3300, -5.5),
                (3700, 4), (15740, -2), (15950, -60)]


def record(dry):
    """Small microphone, then brief dropouts."""
    heard = filtered(dry, shape(MIC_RESPONSE))
    return roll_off(heard * dropouts())


dry = scene()
out = record(dry)
to_wav(out)
```